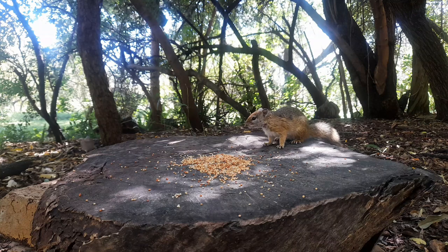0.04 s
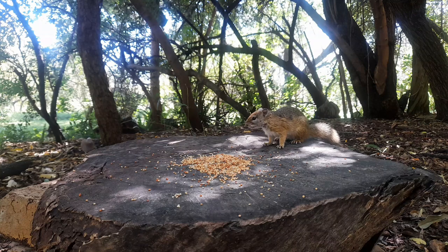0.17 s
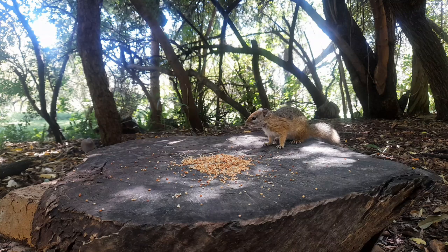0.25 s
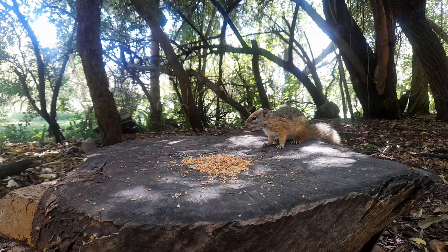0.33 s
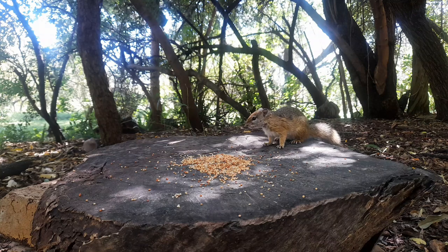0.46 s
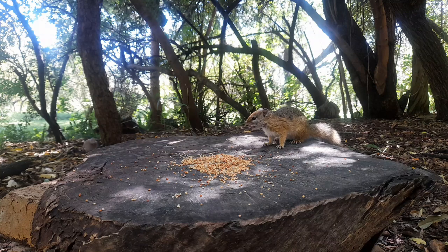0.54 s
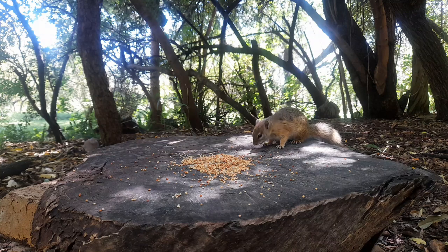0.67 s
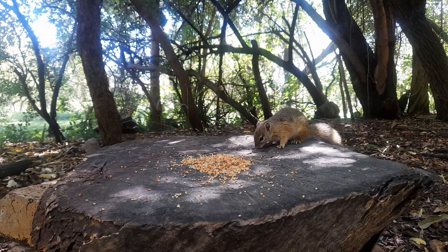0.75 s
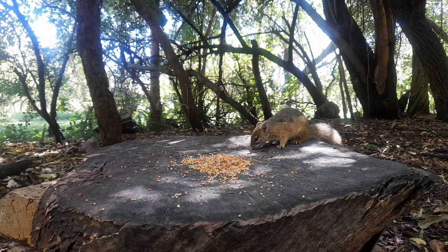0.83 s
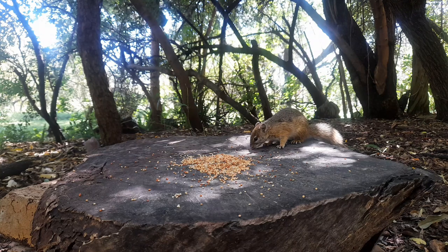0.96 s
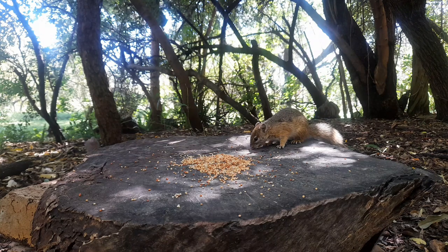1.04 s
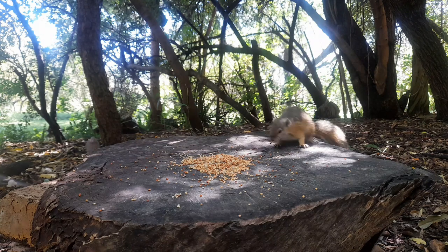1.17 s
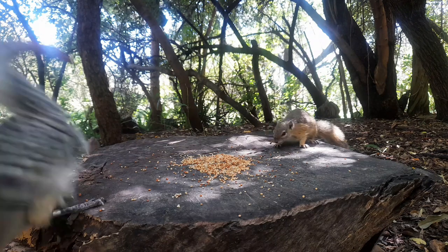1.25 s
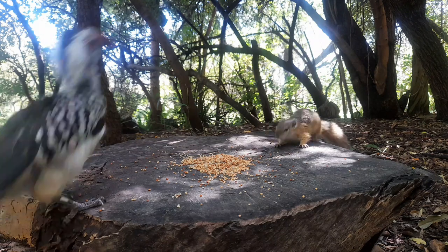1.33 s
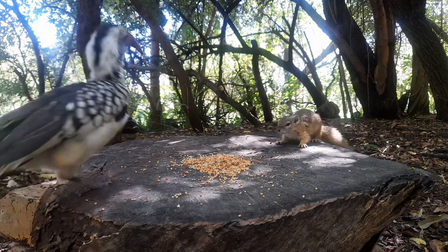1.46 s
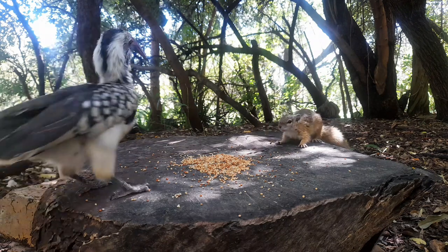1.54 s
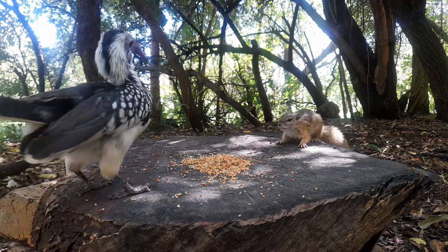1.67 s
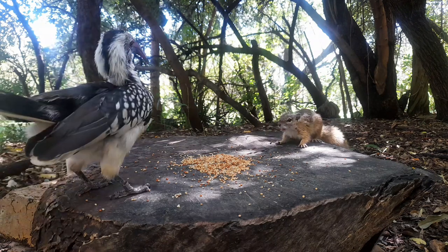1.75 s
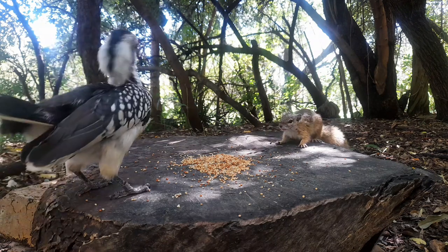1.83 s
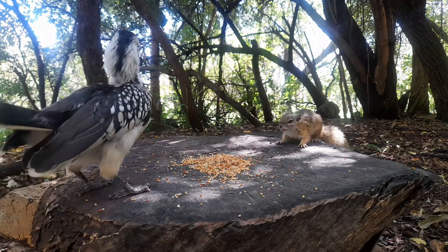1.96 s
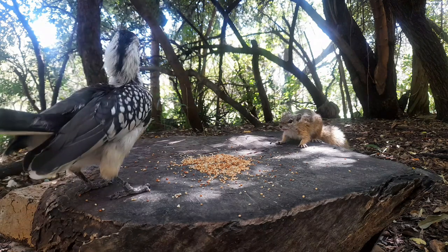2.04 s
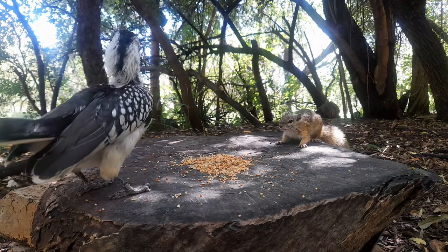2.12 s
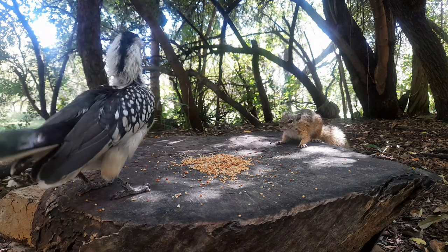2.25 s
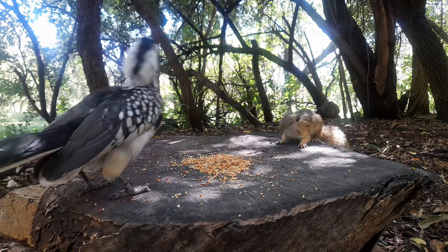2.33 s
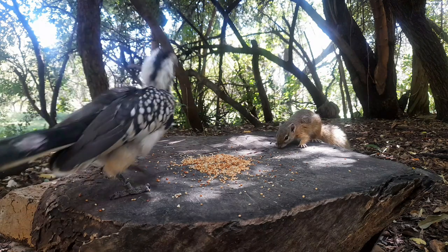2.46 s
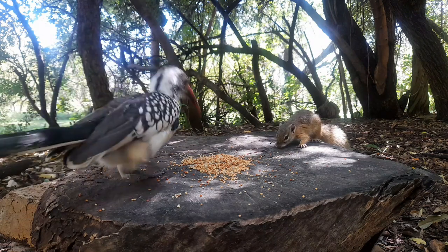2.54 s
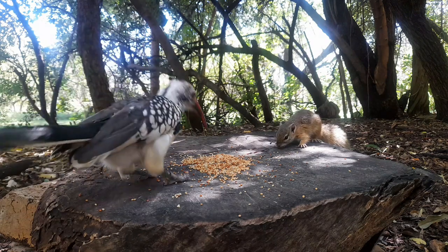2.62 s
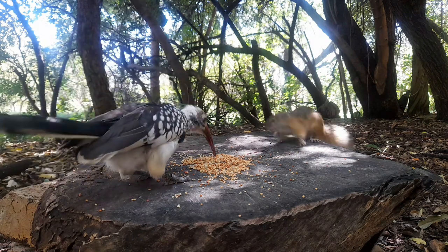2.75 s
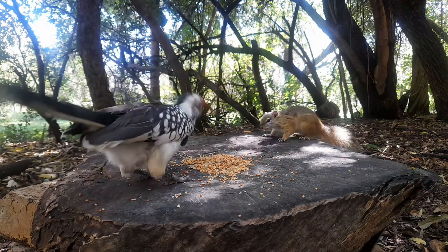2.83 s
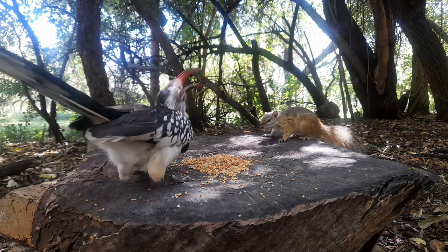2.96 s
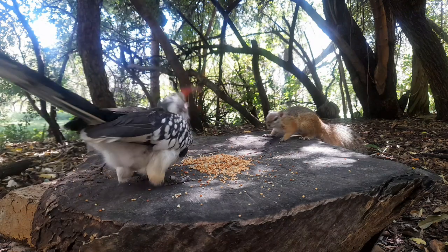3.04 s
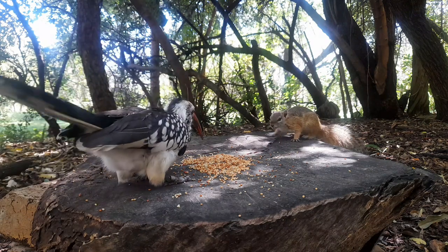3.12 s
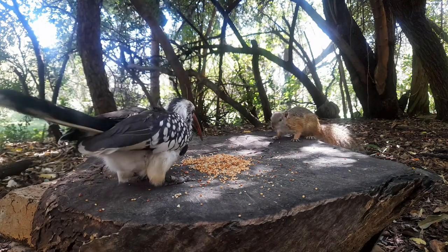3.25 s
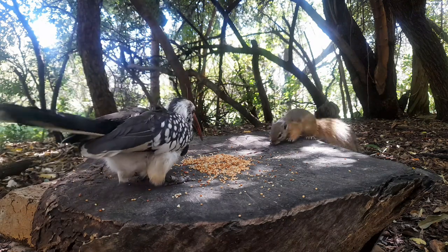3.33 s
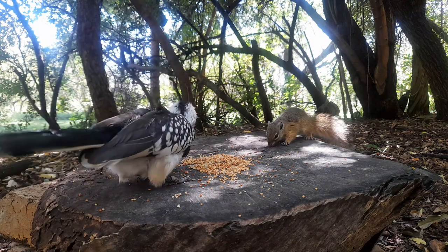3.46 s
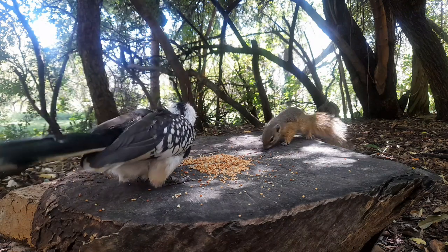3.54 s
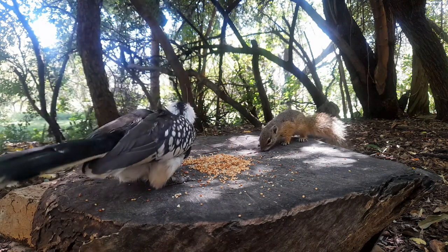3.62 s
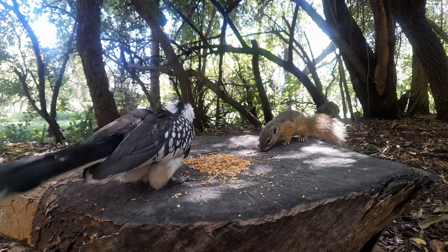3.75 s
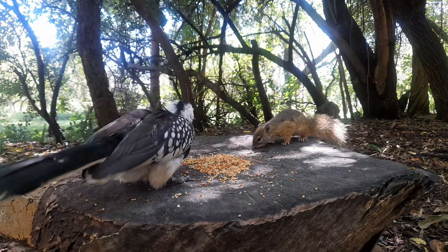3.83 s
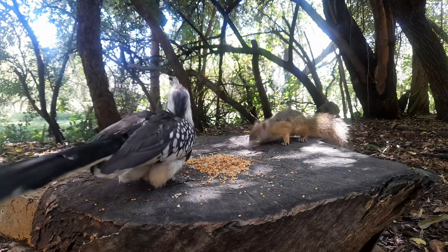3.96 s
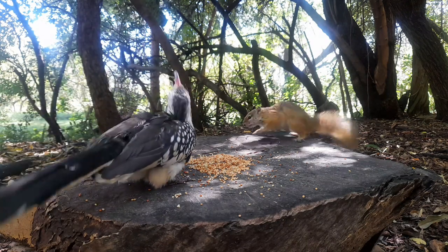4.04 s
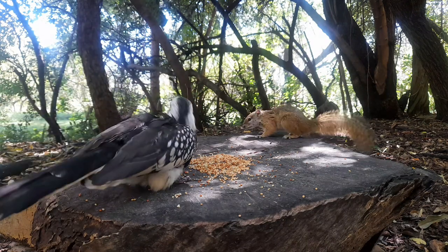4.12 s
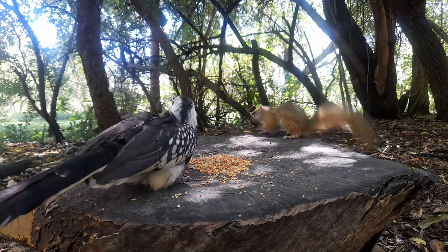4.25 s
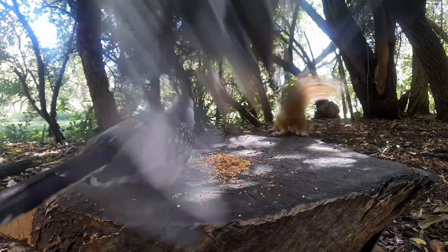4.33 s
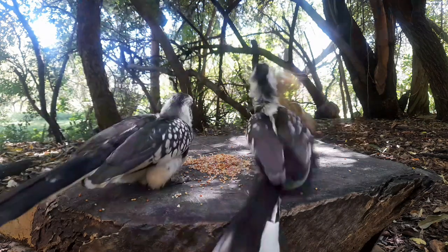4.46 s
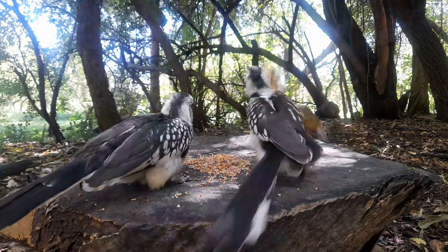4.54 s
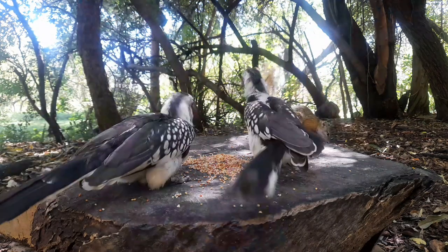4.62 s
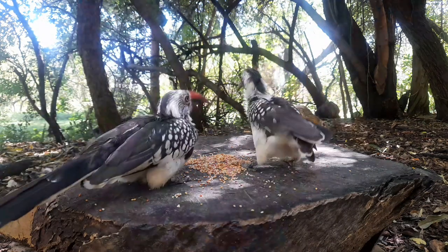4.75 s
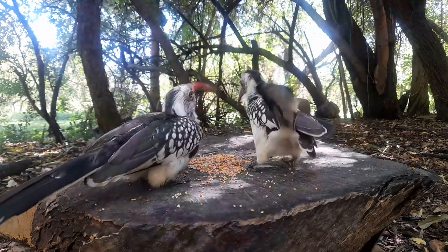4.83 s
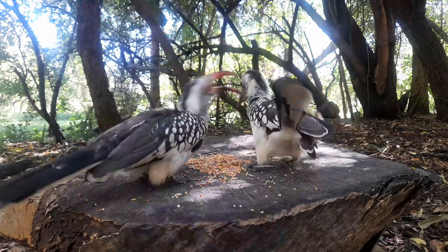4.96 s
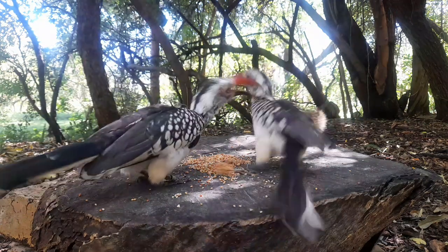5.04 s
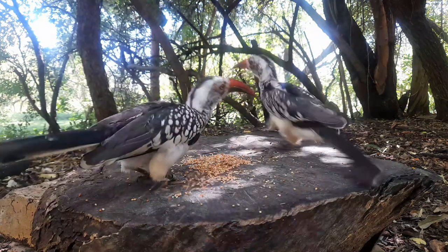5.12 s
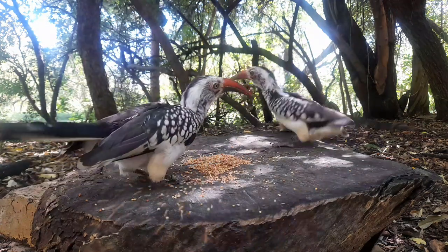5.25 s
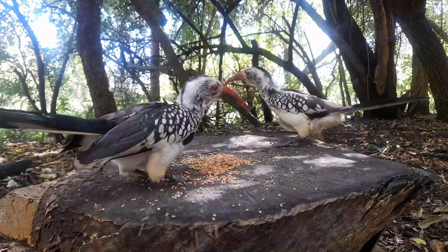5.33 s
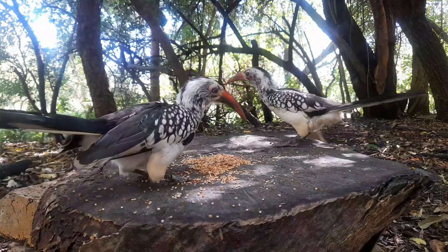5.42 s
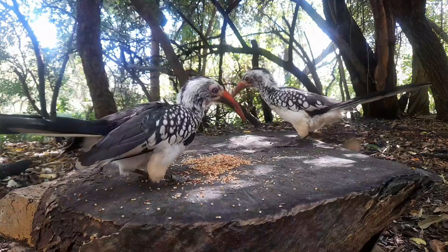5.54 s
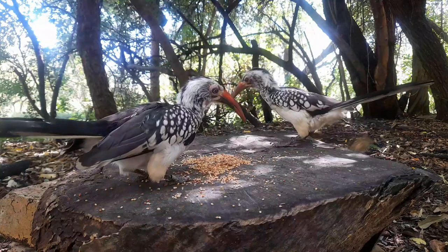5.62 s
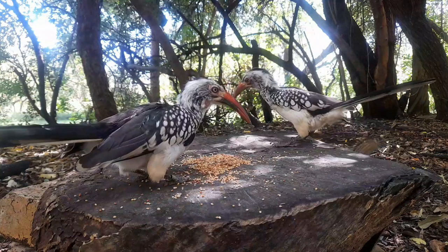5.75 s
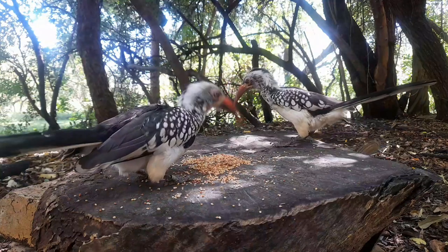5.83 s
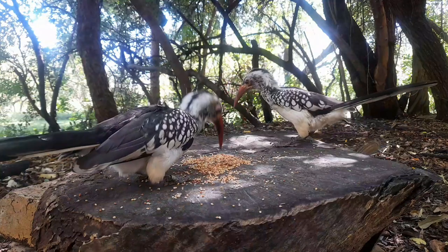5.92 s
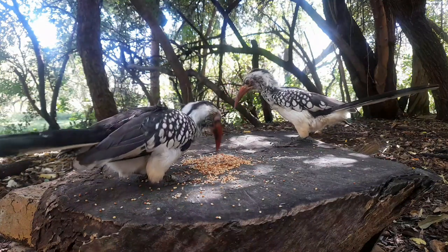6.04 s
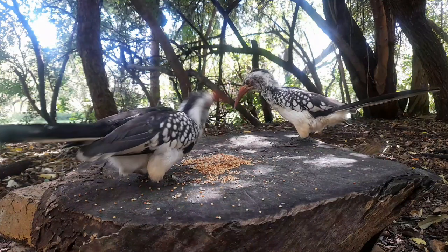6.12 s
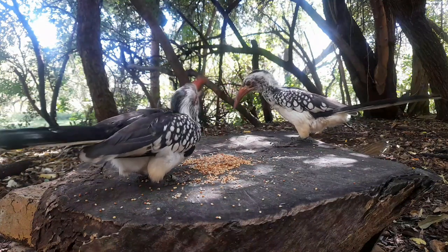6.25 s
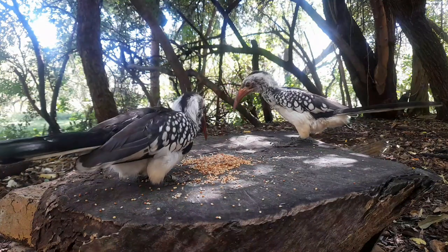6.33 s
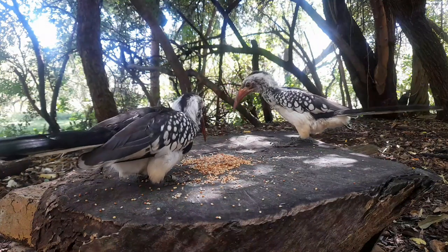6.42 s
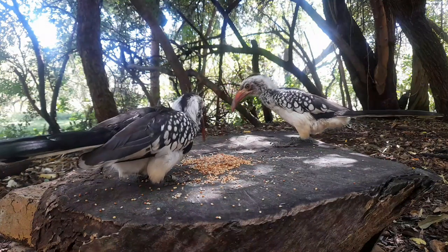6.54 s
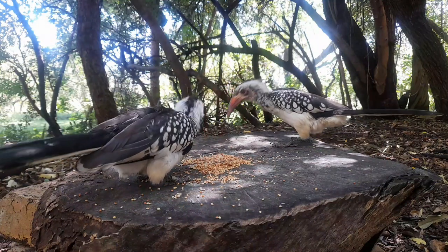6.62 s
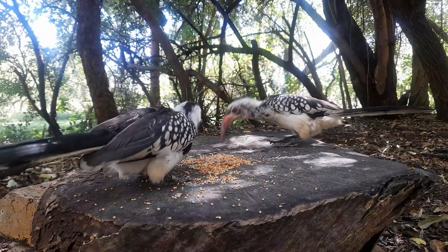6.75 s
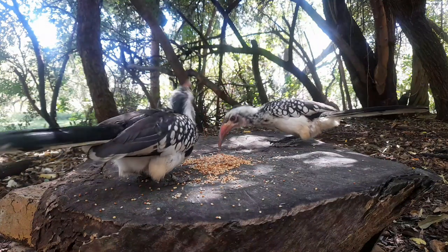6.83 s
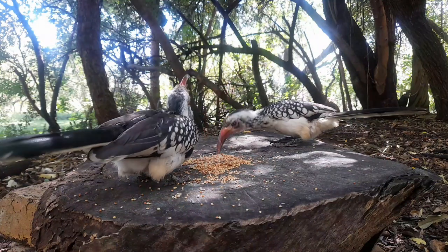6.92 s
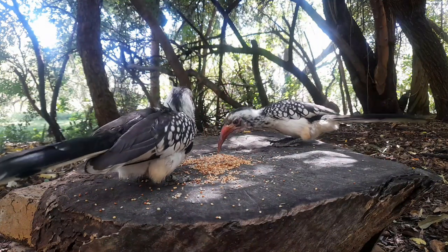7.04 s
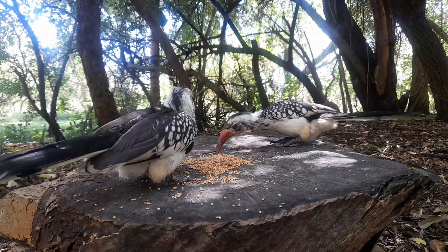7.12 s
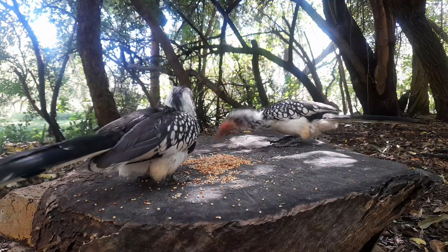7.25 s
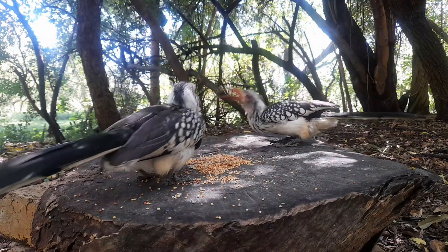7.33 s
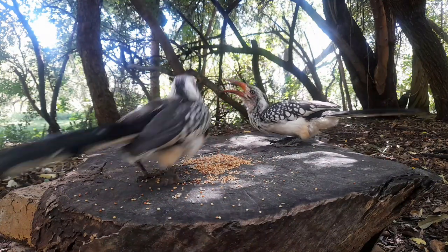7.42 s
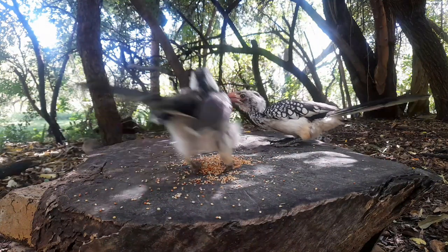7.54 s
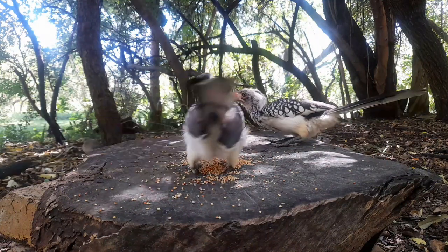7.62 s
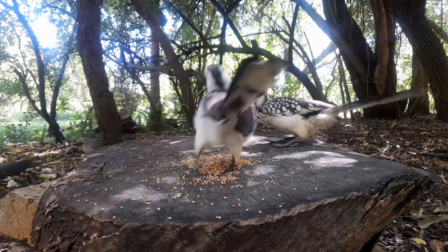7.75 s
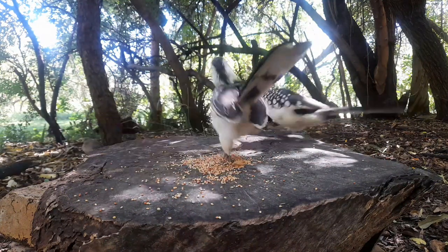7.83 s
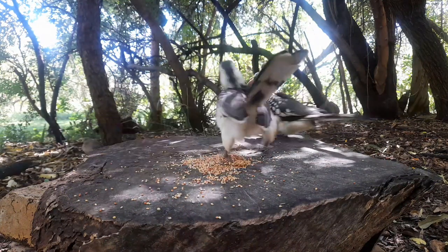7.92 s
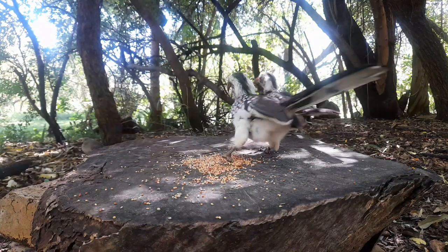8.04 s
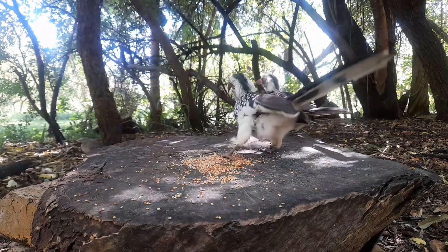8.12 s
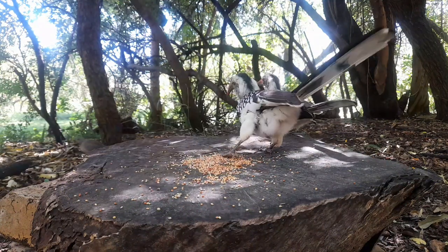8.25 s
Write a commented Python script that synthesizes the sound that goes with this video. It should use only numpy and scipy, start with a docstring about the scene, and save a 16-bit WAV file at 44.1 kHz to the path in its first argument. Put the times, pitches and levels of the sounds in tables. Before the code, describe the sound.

Two hornbills flutter onto a seed-strewn stump in quiet woodland, with short low clucks, hissing feathers, hollow wing thumps and crackling claws and seeds.

```python
"""Over a quiet woodland floor of noise and a low hum of sine and filtered noise, two hornbills flurry in at 1 s.
Feathers hiss and strokes rush (shaped noise), downwash buffets the ports; gliding tones cluck to 2.9 s.
At 4 s they spar loudest on a seed-strewn stump: claps of noise, hollow thumps of short ringing modes, crackling
ticks of claws, bills and seeds, then clucks and a hop at 5.1 s. After a lull with soft rustles, clucks and feathers
return at 7.4 s. Faint far notes of narrow noise come near 3.6, 6.7 and 8.1 s; trunks scatter dull echoes."""
import sys
import numpy as np
from scipy import signal
from scipy.fft import rfft, irfft, next_fast_len
from scipy.io import wavfile
from scipy.ndimage import uniform_filter1d

SR = 44100
rng = np.random.default_rng(int(sys.argv[2]) if len(sys.argv) > 2 else 0)


def store_wav(level_fs):
    """Save 16-bit WAV to argv[1]."""
    pcm = np.round(np.clip(np.atleast_2d(level_fs), -1, 1) * 32767)
    wavfile.write(sys.argv[1], SR, pcm.T.astype(np.int16))


N = 365148

# clucks: (time [s], length [ms], held pitch [Hz], top pitch [Hz], top reached after [ms], flick up to it [ms],
#          level before shaping [dB], fade over the note [dB], second harmonic before bill shaping [dB],
#          left lead [ms])
CLUCK_NOTES = [(1.214, 24.5, 682, 815, 14.4, 6.3, -35, 13.5, -17, 0.41),
               (1.294, 37, 743, 1110, 15.4, 8.3, -30.5, 21.5, -21, 0.38),
               (1.379, 35.5, 561, 790, 31, 5.3, -31.5, 12, -10.5, 0.27),
               (1.497, 24.7, 574, 824, 20.6, 5, -34.5, 11, -16.5, 0.21),
               (2.095, 40, 806, 1100, 18.2, 10.6, -44.5, 9, -30, 0.37),
               (2.43, 53, 517, 617, 24.2, 8.4, -48, 11, -15.5, 0.3),
               (2.638, 36.6, 784, 1017, 19.7, 10.6, -38.5, 11, -27, 0.15),
               (2.751, 29, 607, 818, 18.3, 3.5, -38, 10, -21, 0.14),
               (2.855, 20, 557, 568, 3.6, 1.95, -77, 4, 25.5, -0.41),
               (3.635, 46, 604, 428, 16, 12.6, -66.5, 12.5, 17, -0.4),
               (4.257, 53, 484, 620, 18.3, 8.1, -39, 7, -11, 0.15),
               (4.369, 29, 512, 585, 26, 10.4, -39.5, -6.5, -9, .057),
               (4.417, 33, 554, 631, 16.5, 10.7, -31, 9.5, -6.5, 0.1),
               (4.509, 32, 551, 743, 33, 8.2, -33.5, 4.5, -6.5, 0.12),
               (4.533, 29.3, 422, 513, 23.7, 20, -41, 9.5, 5.5, .031),
               (4.628, 26, 413, 492, 16, 7.4, -47, 9, 8.5, 0),
               (4.638, 33.4, 569.5, 665, 53, 3.8, -32, 14.5, -12, 0.16),
               (4.937, 28.7, 603, 743, 23, 5.9, -38, 3, -22.5, 0.13),
               (5.031, 31.5, 636, 740, 18, 6.3, -35.5, 16, -15, .077),
               (5.118, 27.7, 585, 880, 21, 7.8, -35, 11.5, -17.5, .073),
               (5.195, 34.5, 534, 786, 31, 5, -34.5, 4, -13, .08),
               (5.318, 21, 637, 698, 12, 5.1, -36.5, 18.5, -31, 0.074),
               (5.399, 43.5, 419, 530, 24, 5.7, -42.5, 12.5, -2, -.054),
               (6.023, 26, 550, 542, 3.9, 2, -78.5, 8, 26.5, -0.39),
               (7.425, 36.4, 774, 903, 20.4, 17.3, -42, 2, -21, 0.14),
               (7.513, 35.8, 576, 811, 26.7, 6.9, -48.5, -9.5, -13.5, .12),
               (7.664, 29.6, 580, 753, 22, 4.7, -49, -7.5, -14, .11),
               (7.981, 23.7, 775, 848, 14, 8, -43.5, 10.5, -23, .04),
               (8.079, 26, 629, 870, 20.4, 5.4, -39, 4.5, -25.5, 0.064),
               (8.197, 46, 451, 527, 13.7, 8.5, -66.5, 9, 16.5, 0)]
# flurries of wings and feathers: (time [s], hiss [dB], dull rush of the stroke [dB])
WING_FLURRIES = [
    [(0.93, -79.5, -105), (0.99, -65, -76), (1.13, -56.5, -62), (1.25, -63, -67.5), (1.28, -59, -63),
     (1.35, -69.5, -78), (1.46, -71, -79), (1.52, -67.5, -73.5), (1.7, -76.5, -94)],
    [(3.78, -87, -93), (3.81, -71.5, -85), (3.86, -74, -76), (3.93, -63, -67.5), (3.99, -66, -66.5),
     (4.03, -55.5, -54.5), (4.11, -57.5, -58), (4.2, -48.5, -45), (4.23, -56, -51.5), (4.26, -44.5, -42),
     (4.4, -54.5, -51.5), (4.45, -53.5, -46.5), (4.51, -56.5, -61), (4.75, -83, -77)],
    [(5.04, -76.5, -62), (5.09, -42, -70), (5.12, -66.5, -59), (5.17, -58.5, -77), (5.23, -64.5, -66),
     (5.35, -73.5, -80), (5.42, -74.5, -67), (5.55, -67, -75), (5.69, -78, -93), (5.78, -80, -101)],
    [(7.54, -103, -84), (7.58, -71, -68.5), (7.64, -77, -78.5), (7.79, -92, -85), (7.86, -70, -85.5),
     (7.99, -68.5, -75), (8.14, -75.5, -78)],
]
# place of the moving bird: (time [s], left-right [dB])
BIRD_SIDE = [(1.1, 5.5), (1.7, 4), (3.8, 2), (5.2, 0), (5.6, 3), (7.6, 0)]
# wing claps: (time [s], nominal peak [dB], swell time constant [ms], tail time constant [ms], left-right [dB])
WING_CLAPS = [(4.434, -26, 2.2, 12, 1), (4.458, -22, 6.5, 1.8, 2), (4.474, -33.5, 5.4, 5.8, -4),
              (5.091, -22.5, 2.7, 1.04, -2), (5.097, -46.5, 2.3, 3.7, -26), (5.164, -50, 3, 4.4, -1)]
# claws, bills and seeds on wood: (time [s], peak before panning [dB], centre, held to 15 kHz at most [Hz],
#                                  left-right [dB])
WOOD_TICKS = [(0.249, -54, 5630, 3), (0.277, -56, 5100, 4.5), (0.521, -58.5, 5600, 4),
              (0.784, -50.5, 9000, 12.5), (0.7966, -51, 6400, 4), (1.2722, -41, 4030, 2),
              (1.4316, -50, 14700, 19), (1.4858, -45, 13800, 12.5), (1.497, -46.5, 6700, 9.5),
              (1.509, -47, 4950, 0.5), (1.5716, -50, 11700, 16), (1.7795, -57, 8000, 20),
              (1.9879, -42.5, 5840, 12), (2.5082, -50.5, 5700, 4.0), (2.522, -51.5, 13300, 9),
              (3.3374, -58.5, 6050, -11.5), (4.028, -42, 3600, 2), (4.5329, -49, 3160, 34.5),
              (4.787, -49.5, 5100, -8), (5.088, -29, 4800, 4.5), (5.1092, -40, 4180, -3.5),
              (5.134, -39, 5260, 5), (5.1595, -29, 5460, 2.5), (5.211, -44.5, 4060, 0),
              (5.352, -57, 7600, 11), (5.487, -48, 4070, 2), (5.4958, -47, 7140, 19),
              (5.541, -44.5, 13000, 9.5), (5.6264, -55, 12000, 12), (5.6367, -46.5, 5800, 7),
              (5.681, -53, 13100, 12), (5.707, -48.5, 12700, -5.5), (5.72, -55, 5900, -2),
              (5.737, -56, 11000, 6), (7.5686, -53, 14200, 12), (7.5832, -47.5, 4700, 3),
              (7.6045, -44.5, 13000, 0.5), (7.694, -51, 5630, 6), (7.8567, -41.5, 6450, 2.5),
              (7.8677, -48, 14400, 9), (7.948, -63, 3500, -6), (7.9805, -54, 5790, -5),]
# hollow thumps of wingbeats and knocks: (time [s], level before the mode levels [dB], hardness [dB per octave])
THUMPS = [(1.273, -50, 11), (1.989, -55.5, 9.5), (4.026, -32, 3.5), (4.118, -41, 4), (4.141, -32.5, 0),
          (4.261, -27.5, -3), (4.343, -38, 1), (4.461, -25, -7), (4.597, -57, 0), (5.09, -34, 13)]
# short ringing modes shared by all thumps: (frequency [Hz], level [dB], 60 dB decay [ms])
THUMP_MODES = [(147, -6, 67), (318, 2, 14), (514, 4, 17), (630, -7, 12), (1280, -13.5, 5.2),
               (2540, -12, 5.3)]
# soft rustles of feet and feathers: (time [s], length [ms], centre [Hz], width of each resonance [Hz],
#                                     rms before the fade shape [dB])
FOOT_RUSTLES = [(.41, 250, 5400, 2500, -76), (.785, 81, 6100, 3000, -64), (1.99, 96, 5100, 5100, -63.5),
                (2.09, 140, 12500, 6130, -68), (5.43, 42, 6070, 2000, -60.5), (6.55, 200, 6500, 2970, -77),
                (6.72, 180, 5440, 2080, -65)]
# downwash on the ports: (time [s], level [dB], left-right [dB])
PORT_DOWNWASH = [
    [(1.0, -71, 3), (1.09, -53.5, 1), (1.13, -48, -1), (1.17, -55, -1), (1.22, -45, 4), (1.26, -86, 0)],
    [(3.95, -70, -7), (4.02, -53, -7), (4.07, -61, -4), (4.2, -42, 0), (4.33, -38.5, 1),
     (4.36, -28.5, -5.5), (4.41, -40.5, 27), (4.48, -29, -4), (4.51, -45, 24.5), (4.66, -48, 10.5),
     (4.72, -53, -5), (4.79, -61, 20), (4.82, -67, 7)],
]
# low hum: (time [s], upper hum [dB], lower rumble [dB])
LOW_HUM = [
    [(0.0, -89.5, -86), (0.298, -70, -72), (0.35, -92, -98), (0.526, -60.5, -69), (0.656, -67.5, -70),
     (0.678, -73, -97), (0.754, -62, -72), (0.84, -93, -86), (0.976, -72, -72), (1.0, -87, -74)],
    [(1.3, -70.5, -77), (1.88, -61, -64), (2.55, -78.5, -77), (2.7, -55.5, -60.5), (3.04, -70, -73),
     (3.17, -57, -69), (3.2, -53.5, -86), (3.31, -58.5, -60.5), (3.69, -72, -72), (3.9, -59, -57)],
    [(4.82, -73, -83), (4.89, -57, -52), (5.38, -50.5, -68), (5.9, -68.5, -68), (6.81, -53.5, -60),
     (6.86, -67.5, -68.5), (7.72, -60.5, -63.5), (7.93, -71.5, -73), (8.18, -60.5, -62.5),
     (8.28, -80, -67.5)],
]
# faint far notes: (time [s], length [ms], centre [Hz], width of each resonance [Hz],
#                   rms before the swell shape [dB])
FAR_NOTES = [(6.72, 75, 1750, 250, -75), (6.72, 80, 4500, 450, -71), (3.575, 30, 6600, 500, -77),
             (8.085, 105, 4850, 90, -80), (8.19, 130, 4700, 90, -82)]
# relative spectra of feather hiss, wing stroke, port buffeting and floor: (frequency [Hz], density [dB per Hz])
FEATHER_SPECTRUM = [(1410, -11), (2400, -10), (2540, -14.5), (3430, -8.5), (3710, -8), (5600, -5),
                    (8120, -14), (12100, -8), (15200, -5), (15900, -15)]
STROKE_SPECTRUM = [(200, 0.5), (450, -5), (900, -10.5), (1900, -15.5), (3200, -15.5)]
BUFFET_SPECTRUM = [(30, -36), (50, 11.5), (80, 8.5), (130, 3.5), (250, -11), (400, -33), (700, -34)]
WOODS_SPECTRUM = [(71, -37.5), (120, -6.5), (128, -10), (245, -17.5), (289, -14), (369, -25.5), (642, -20),
                  (740, -24.5), (1340, -27.5), (3230, -35), (6340, -30), (8100, -36.5), (13800, -27),
                  (15900, -29.5)]

# pitch of the clucks
CLIMB_HZ_PER_MS = 3.66  # the held note creeps up
ONSET_HZ, ONSET_MS = 96.3, 1.25  # held notes start a little sharp, arched ones flat
SAG_MS, SAG_SHARE = 10.8, 0.48  # the pitch sags past its top, slower the more of the note is left
REST_SHARE = .62  # pitch at rest, as a share of the lower of held and top pitch
# level and overtones of the clucks
STRAIN_DB_PER_OCTAVE = 3  # the voice thins as it is pushed up
ROUND_DB = 3.5  # the level arches over the note
SHIMMER_DB = 1  # the level of the voice shakes too
BILL_WIDEST, BILL_DB = 0.38, 23  # share of the note when the bill is widest; overtone loss away from it
SHUT_DB, SHUT_MS = 4, 3.4  # the overtones drop around the top of the pitch
# faint ticks at random while feathers move: rate, most they rise over the hiss, loudest
PATTER_PER_S, PATTER_DB, PATTER_TOP_DB = 28, 13, -58
WOODS_DB = -74.5
CUTOFF_HZ = 15950


def amp(db):
    """dB to gain."""
    return 10 ** (np.asarray(db) / 20)


def rms_one(x):
    """Scale to rms 1."""
    return x / np.sqrt(np.mean(x ** 2) + 1e-20)


def sides(pan_db):
    """Gains of left and right for a left-right difference."""
    return np.array([amp(pan_db / 2), amp(-pan_db / 2)])


def in_time(tables):
    """A gate that is open while a table lasts, then the columns of the curves per sample."""
    t = np.arange(N) / SR
    s, *columns = np.transpose(np.vstack(tables))
    gate = 0
    for table in tables:
        start, end = table[0][0], table[-1][0]
        gate = gate + np.interp(t, [start - .02, start, end, end + .02], [0, 1, 1, 0])
    return [gate] + [np.interp(t, s, column) for column in columns]


def drift(rate_hz):
    """Slow random wander with spread 1: noise through two equal lowpass poles, made at SR / 40."""
    r = np.exp(-80 * np.pi * rate_hz / SR)
    white = rng.standard_normal(N // 40 + 2002)
    slow = signal.lfilter([1], [1, -2 * r, r * r], white)[2000:]
    return np.interp(np.arange(N) / 40, np.arange(len(slow)), rms_one(slow - slow.mean()))


def coloured(spectrum, alike_hz):
    """Stereo noise of a given spectrum at rms 1, ever more alike on both sides below alike_hz."""
    size = next_fast_len(N)
    hz = np.maximum(np.arange(size // 2 + 1) * SR / size, 1)
    points = np.array(spectrum)
    shape = amp(np.interp(np.log(hz), np.log(points[:, 0]), points[:, 1], left=-90, right=-90))
    alike = 1 / (1 + (hz / alike_hz) ** 2)
    mid, side = rfft(rng.standard_normal((2, size))) * shape
    both = np.sqrt(1 + alike) * mid + np.sqrt(1 - alike) * side * [[1], [-1]]
    return rms_one(irfft(both, size)[:, :N])


def resonate(x, hz, width_hz):
    """One resonance, gain 1 on top."""
    r = np.exp(-np.pi * width_hz / SR)
    return signal.lfilter([(1 - r * r) / 2, 0, (r * r - 1) / 2], [1, -2 * r * np.cos(2 * np.pi * hz / SR), r * r], x)


def resonate_twice(x, hz, width_hz):
    """The same resonance two times over, for steeper skirts."""
    return resonate(resonate(x, hz, width_hz), hz, width_hz)


def add(out, s, piece):
    """Mix a stereo piece in at time s."""
    at = round(s * SR)
    out[:, at:at + piece.shape[1]] += piece[:, :N - at]


def puffs(table, shape):
    """Noise twice through one resonance: narrow ones whistle, broad ones rustle."""
    out = np.zeros((2, N))
    for s, ms, hz, width_hz, level_db in table:
        size = round(ms * SR / 1000)
        tone = resonate_twice(rng.standard_normal((2, 12000)), hz, width_hz)
        add(out, s, amp(level_db) * rms_one(tone[:, -size:]) * shape(np.arange(size) / size))
    return out


def cluck_pitch(t, ms, held_hz, top_hz, top_ms, flick_ms):
    """The pitch creeps up, flicks to its top and arches over towards rest."""
    climb = CLIMB_HZ_PER_MS * np.clip(t, 0, top_ms - flick_ms)
    onset = ONSET_HZ * (1 - 2 * flick_ms / top_ms) * np.exp(-np.maximum(t, 0) / ONSET_MS)
    held = held_hz + climb + onset
    flick = np.sin(np.pi / 2 * np.clip(1 + (t - top_ms) / flick_ms, 0, 1))
    rest = REST_SHARE * min(held_hz, top_hz)
    sag_ms = SAG_MS + SAG_SHARE * (ms - top_ms)
    sag = np.exp(-(np.maximum(t - top_ms, 0) / sag_ms) ** 1.61)
    hz = rest + (held + (top_hz - held) * flick - rest) * sag
    return uniform_filter1d(hz, round(0.0015 * SR))


def clucks(third_db=-14, edge_ms=3.4, close_ms=7.5, waver=.015, breath_db=-34):
    """Each cluck is a short gliding tone with two overtones and some breath, offset in time between the ports."""
    out = np.zeros((2, N))
    for s, ms, held_hz, top_hz, top_ms, flick_ms, start_db, loss_db, second_db, lead_ms in CLUCK_NOTES:
        t = np.arange(-8, ms + 14, 1000 / SR)  # ms
        hz = cluck_pitch(t, ms, held_hz, top_hz, top_ms, flick_ms)
        level_db = start_db - loss_db * t / ms - ROUND_DB * (2 * t / ms - 1) ** 2
        level_db -= STRAIN_DB_PER_OCTAVE * np.log2(hz / held_hz)
        # the voice opens and shuts within a few cycles
        level_db -= 6 * (np.maximum(0.17 * ms - t, 0) / edge_ms) ** 2
        level_db -= 6 * (np.maximum(t - 0.83 * ms, 0) / close_ms) ** 2
        white = rng.standard_normal((2, 4000))
        shake = uniform_filter1d(white[0], 60)[:len(t)] * np.sqrt(60)
        phase = 2 * np.pi * np.cumsum(hz * (1 + waver * shake)) / SR
        # the overtones fade as the bill closes, unless they carry the note
        bill_db = -BILL_DB * (t / ms - BILL_WIDEST) ** 2 - SHUT_DB * np.tanh((t - top_ms) / SHUT_MS) / 2
        closing = amp(bill_db * (second_db < 0))
        second = amp(second_db) * np.sin(2 * phase + 1)
        third = amp(min(second_db, 0) + third_db) * np.sin(3 * phase)
        voice = np.sin(phase) + closing * (second + third)
        # breath pulses with each cycle of the voice
        breath = rms_one(resonate_twice(white[1], 1900, 1800))[:len(t)] * (1 + np.sin(phase))
        voice = voice + breath * amp(breath_db + max(second_db, 0))
        voice = voice * amp(level_db + SHIMMER_DB * shake[::-1])
        add(out, s - .008, np.array([np.interp(t + k * lead_ms / 2, t, voice) for k in (1, -1)]))
    return out


def wings(flutter_db=2.0, grain_db=0.3, flap_db=3.0):
    """Air tears past feather edges (hiss) and breaks round the wing in lumps (dull rush); claps burst with both."""
    gate, hiss_db, rush_db = in_time(WING_FLURRIES)
    side = sides(in_time([BIRD_SIDE])[1])
    feather, stroke = coloured(FEATHER_SPECTRUM, 1800), coloured(STROKE_SPECTRUM, 530)
    lumps = drift(21)
    # single feathers snap past each other at random, 60 per second: short bursts on top of the hiss
    snaps = (rng.random(N) < 60 / SR) * rng.exponential(0.4, N)
    ragged = 1 + signal.lfilter([1], [1, -np.exp(-400 / SR)], snaps)
    hiss = amp(hiss_db + flutter_db * lumps + grain_db * drift(180)) * rms_one(ragged) * feather
    rush = amp(rush_db + flap_db * lumps) * stroke
    out = gate * side * (hiss + rush)
    t = np.arange(N) / SR
    for s, peak_db, swell_ms, tail_ms, side_db in WING_CLAPS:
        shape = np.exp(np.minimum((t - s) / swell_ms, (s - t) / tail_ms) * 1000)
        # 9.5 dB leaves room for the peaks of the noise
        out += amp(peak_db - 9.5) * shape * sides(side_db)[:, None] * (feather + stroke)
    return out


def ticks(colour=0.55, broad_db=-9, ms=2.16, apart_ms=.025):
    """A few milliseconds of crackle through a peak, with a broadband edge; the louder side hears it first."""
    out, t = np.zeros((2, N)), np.arange(1200) / SR
    for s, peak_db, hz, pan_db in WOOD_TICKS + patter():
        white = rng.standard_normal((3, 1200))
        # one noise shared by both sides plus one of its own on each
        burst = (white[0] + 0.78 * white[1:]) * np.exp(-1000 * t / ms) * np.minimum(t * 4000, 1)
        hz = min(hz, 15000)
        tick = resonate_twice(burst, hz, colour * hz) + amp(broad_db) * resonate(burst, 3200, 17000)
        tick = amp(peak_db) * sides(pan_db)[:, None] * tick / np.abs(tick).max()
        add(out, s, tick * [[1], [0]])
        add(out, s + pan_db * apart_ms / 1000, tick * [[0], [1]])  # apart_ms is per dB of pan
    return out


def patter():
    """Rows like those of the ticks, at random moments within the flurries and as loud as these allow."""
    gate, hiss_db, _ = in_time(WING_FLURRIES)
    moments = np.flatnonzero(rng.random(N) < gate * PATTER_PER_S / SR)
    rows = []
    for i, (loud, high, left) in zip(moments, rng.random((len(moments), 3))):
        peak_db = min(hiss_db[i] + PATTER_DB * loud, PATTER_TOP_DB)
        rows.append((i / SR, peak_db, 4000 * 2.4 ** high, 16 * left - 2))
    return rows


def thumps():
    """Hollow thumps of wingbeats and knocks: decaying sines at shared modes; hard ones favour the high modes."""
    out, t = np.zeros((2, N)), np.arange(4000) / SR
    for s, thump_db, hard_db in THUMPS:
        ring = np.zeros(len(t))
        for hz, mode_db, t60_ms in THUMP_MODES:
            level_db = thump_db + mode_db + hard_db * np.log2(hz / 525)
            ring += np.sin(2 * np.pi * hz * t) * amp(level_db - 60000 * t / t60_ms)
        ring *= np.minimum(t * 500, 1)
        add(out, s, np.array([ring, ring]))
    return out


def rustles():
    """Feet and feathers brush softly: broad noise with a quick rise and a long fade."""
    return puffs(FOOT_RUSTLES, lambda u: np.minimum(8 * u, 1) * (1 - u) ** 2)


def trunks(x, echo_db=-27, t60_s=.2, dull_hz=2500):
    """Nearby trunks send back a thin, dull scatter of echoes."""
    t = np.arange(SR // 2) / SR
    tail = rng.standard_normal((2, len(t))) * amp(-60 * t / t60_s) * (t > .006)
    tail = signal.lfilter(*signal.butter(1, dull_hz, fs=SR), tail)
    return amp(echo_db) * signal.fftconvolve(x, tail / np.sqrt(np.sum(tail[0] ** 2)), axes=1)[:, :N]


def downwash(lumpy_db=3.0, even=.55):
    """Low buffeting noise, mostly its own on each side; its peaks are evened out, as when a port overloads."""
    gate, level_db, pan_db = in_time(PORT_DOWNWASH)
    buffeting = coloured(BUFFET_SPECTRUM, 55)
    power = uniform_filter1d(buffeting ** 2, 900, axis=1)
    buffeting = rms_one(buffeting / power ** (even / 2))
    lumps = amp(lumpy_db * np.array([drift(29), drift(23)]))
    return gate * amp(level_db) * sides(pan_db) * lumps * buffeting


def hum(waver_hz=1.3, tone_share=.75):
    """A wavering hum near 96 Hz with a blurred upper skirt, above a broader rumble; nearly alike left and right."""
    _, hum_db, rumble_db = in_time(LOW_HUM)
    white = rng.standard_normal((2, 2, N))
    shared = white[0, 0] + 0.75 * white[1]
    tone = np.sqrt(2) * np.sin(2 * np.pi * np.cumsum(96 + waver_hz * drift(4.03)) / SR)
    blur = rms_one(resonate(resonate(shared, 102.7, 18), 93.6, 40))
    upper = np.sqrt(tone_share) * tone + np.sqrt(1 - tone_share) * blur
    skirt = rms_one(resonate(resonate(shared, 220, 120), 230, 200))
    lower = rms_one(resonate(resonate(white[0, 1] + 0.38 * white[1, ::-1], 60, 33), 56, 71))
    return sides(-2.4)[:, None] * (amp(hum_db) * (upper + amp(-20.5) * skirt) + amp(rumble_db) * lower)


def far_notes():
    """Faint far notes: narrow noise with an even swell and fade."""
    return puffs(FAR_NOTES, lambda u: np.sin(np.pi * u) ** .5)


def woods():
    """The steady floor of leaves, air and microphone hiss; it breathes a little."""
    breathing = amp(.6 * drift(5))
    return amp(WOODS_DB) * breathing * sides(-1.2)[:, None] * coloured(WOODS_SPECTRUM, 140)


def scene():
    """Birds, their echoes, the air on the ports, the hum, the far notes and the floor."""
    birds = clucks() + wings() + ticks() + thumps() + rustles()
    return birds + trunks(birds) + downwash() + hum() + far_notes() + woods()


def record(dry):
    """The deepest bass is rolled off and the top is cut steeply."""
    dry = signal.sosfilt(signal.butter(2, 32, "high", fs=SR, output="sos"), dry)
    return signal.sosfilt(signal.cheby2(16, 70, CUTOFF_HZ * 1.02, fs=SR, output="sos"), dry)


dry = scene()
out = record(dry)
store_wav(out)
```